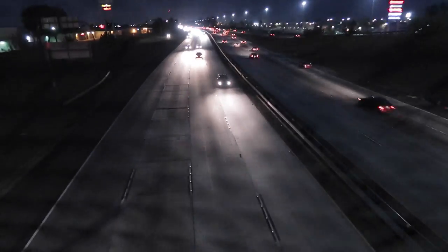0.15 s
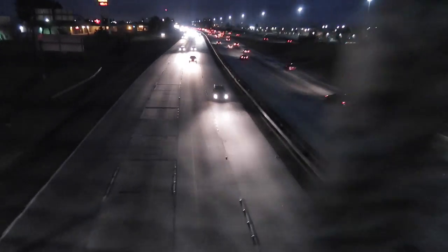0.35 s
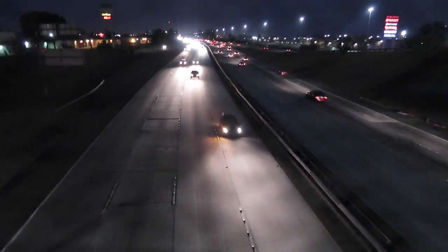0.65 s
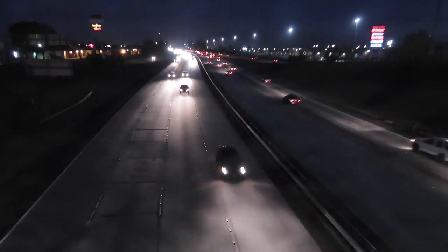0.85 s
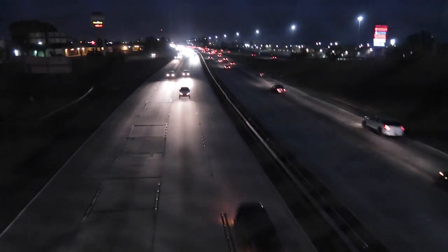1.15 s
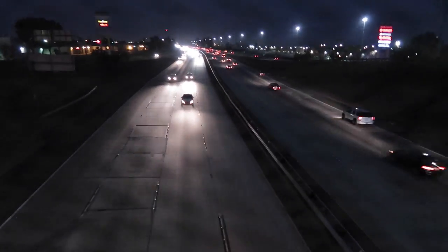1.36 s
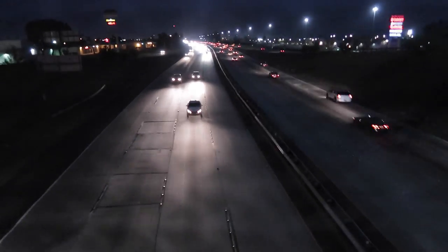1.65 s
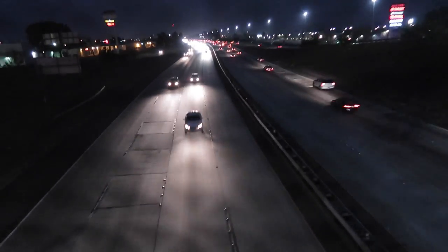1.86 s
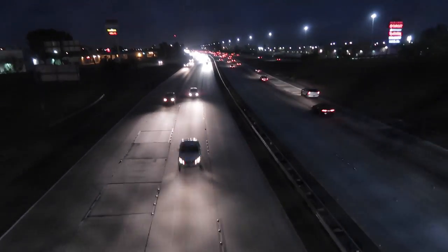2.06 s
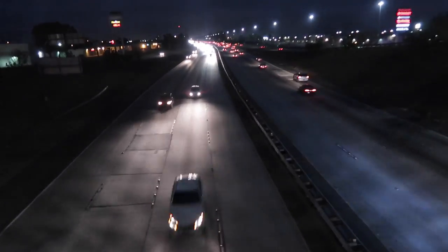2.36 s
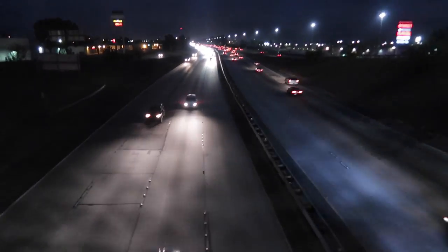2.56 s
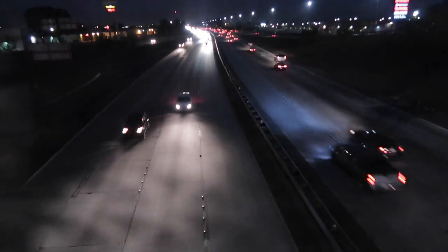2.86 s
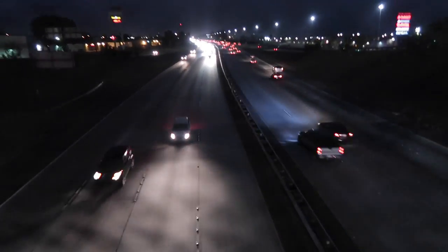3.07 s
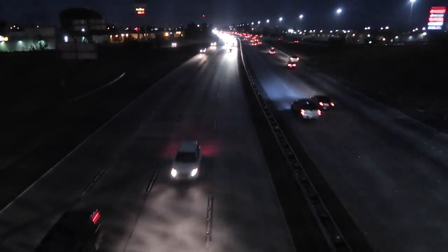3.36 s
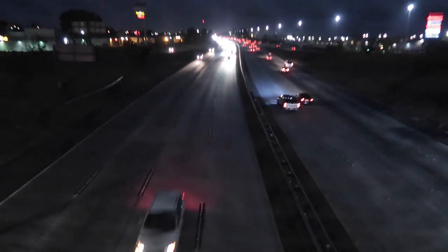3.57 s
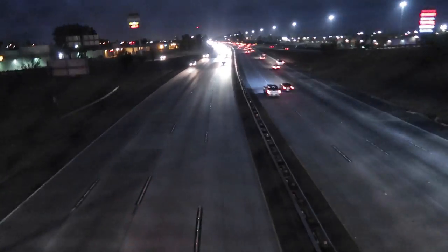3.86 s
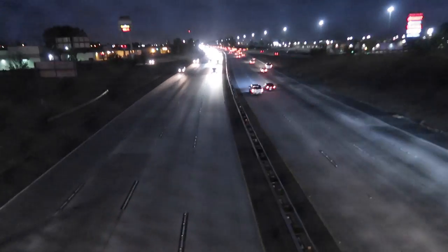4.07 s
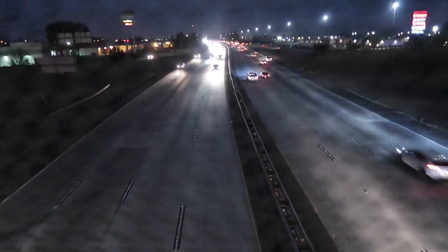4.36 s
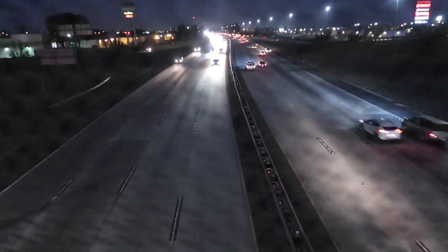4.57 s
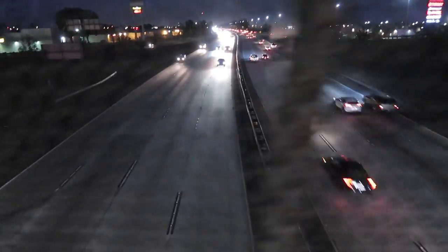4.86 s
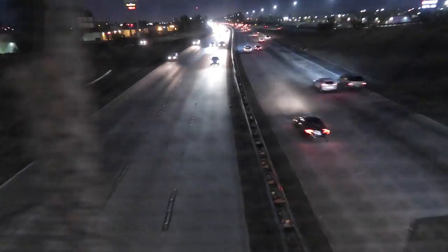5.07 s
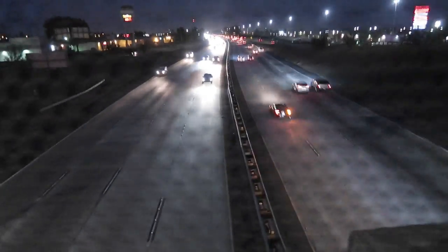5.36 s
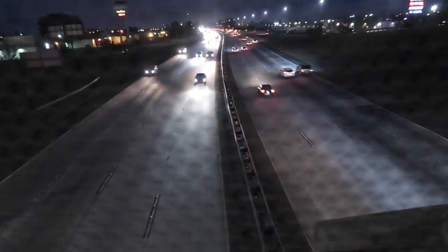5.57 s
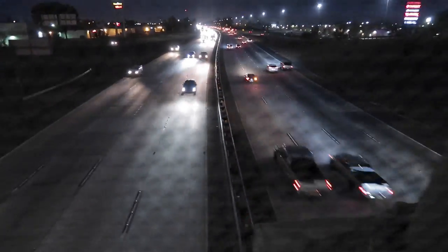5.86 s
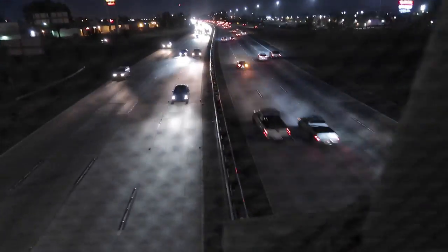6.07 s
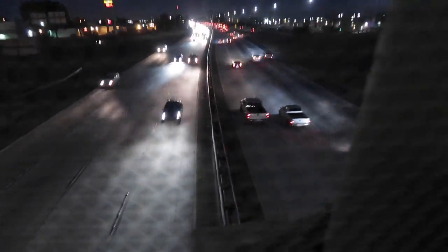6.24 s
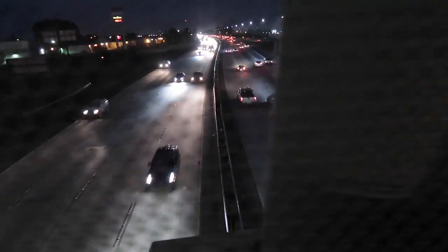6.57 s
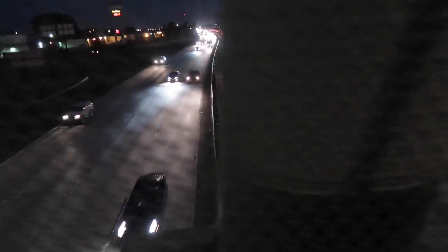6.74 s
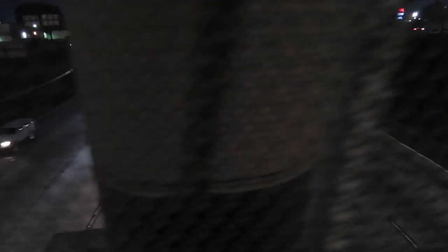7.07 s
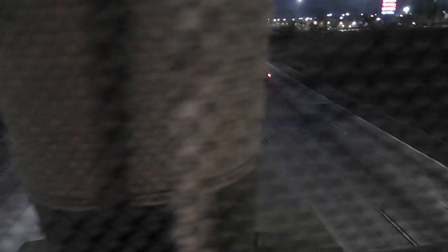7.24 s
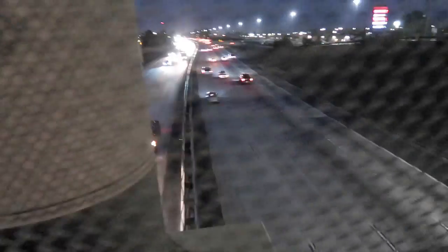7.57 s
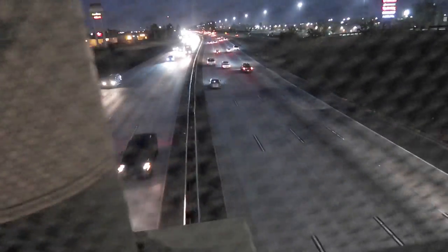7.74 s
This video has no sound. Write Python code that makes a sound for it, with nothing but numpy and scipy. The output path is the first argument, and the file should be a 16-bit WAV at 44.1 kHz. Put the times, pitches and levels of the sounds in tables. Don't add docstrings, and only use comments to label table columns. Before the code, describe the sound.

Steady freeway roar at night, cars swelling past beneath a footbridge with hissing tyres, while wind gusts thump and flutter against a handheld camera's microphone.

```python
import sys
import numpy as np
from scipy import signal
from scipy.fft import rfft, irfft, next_fast_len
from scipy.io import wavfile
from scipy.ndimage import uniform_filter1d, map_coordinates

SR = 44100
rng = np.random.default_rng(int(sys.argv[2]) if len(sys.argv) > 2 else 0)


def bounce(signal):
    frames = np.transpose(np.atleast_2d(signal))
    limited = np.clip(frames, -1, 1)
    pcm = np.round(limited * 32767).astype(np.int16)
    wavfile.write(sys.argv[1], SR, pcm)


def voltage_ratio(decibels):
    exponent = np.asarray(decibels, float) / 20
    return 10 ** exponent


N = 348390
CLOCK_S = np.arange(0, N / SR + .01, .004)

# closest_s, roar_db, half_width_s, brightness_db,
# fizz_db
PASSES = [(.95, -31, 0.27, -2.5, -4), (1.3, -32, 0.15, 3.5, -1), (1.75, -36.5, 0.18, -3.5, -2),
          (2.719, -27.5, 0.32, 0.5, -0.5), (3.15, -31, 0.36, 0.5, -2.5), (3.33, -37.5, .12, 4, -2),
          (3.6, -35, 0.26, 5.5, -2), (4.1, -43, 0.29, -0.5, 3.5), (4.45, -42.5, .15, 6.5, 2.5),
          (4.751, -43, .15, 4.5, 4.5), (5.051, -34.5, 0.21, 2.5, 2), (5.35, -42, .15, 0.5, 7),
          (5.65, -30.5, 0.2, -11, 2.5), (6.049, -24.5, 0.15, -5, 4.5), (6.55, -36, 0.19, 3.5, -3.5),
          (7.2, -46, .15, 7.5, 0), (7.65, -43.5, 0.16, 6, 3), (7.95, -33, 0.12, -1, 0)]
FAR_ROAR_DB, WHINE_DB, HISS_DB, AIR_DB = -38, -15, -24.5, -75
HISS_FLOOR_DB = -67
# freq_hz, level_db_per_hz
ROAR = [(480, 5.5), (560, 1), (640, 3), (720, 1), (820, -1.5), (920, -10), (1030, -17.5), (1200, -18.5),
        (1380, -22.5), (1530, -17.5), (1650, -24), (1800, -35.5)]
# freq_hz, level_db_per_hz
HISS_MID = [(1650, 2), (1850, -6), (2200, -7.5), (2800, -9.5), (3450, -11.5), (3800, -8.5), (4050, -14),
            (4500, -10.5), (4800, -16.5), (5400, -18), (6200, -24.5), (8000, -27.5), (11000, -34.5),
            (12500, -37), (14800, -47)]
# freq_hz, level_db_per_hz
HISS_SIDE = [(1650, 1), (1850, -5.5), (2200, -7.5), (2800, -18), (3450, -13), (3800, -18), (4050, -18),
             (4500, -16.5), (4800, -23), (5400, -26), (6200, -35), (8000, -38), (11000, -46.5),
             (13200, -51.5), (14800, -57.5)]
STEER_HZ = 1665
FIZZ_HZ, AIR_HZ = 4900, 5900
# center_hz, width_hz, level_db
CAVITY_RIDGES = [(3170, 150, 0.5), (3330, 120, -1.5), (3770, 170, -4), (4030, 150, 3.5), (4230, 120, -2.5),
                 (4680, 170, -3.5), (5120, 200, 1), (5650, 220, -2.5)]

# start_s, end_s, first_hz, last_hz, level_db
DRONES = [
    (1.33, 1.87, 157, 145, -28),
    (5.58, 6.25, 143, 132, -33),
    (5.6, 6.15, 770, 725, -42),
    (5.55, 6.15, 685, 655, -42),
    (6.1, 6.72, 645, 630, -40),
    (6.2, 6.5, 600, 595, -44),
]
# time_s, firing_hz, level_db
LORRY = [
    (2.35, 147, -45),
    (2.5, 145, -30),
    (2.75, 135, -28),
    (3.0, 129, -28),
    (3.6, 127, -31),
    (4.2, 128, -30),
    (4.55, 128, -34),
    (5.3, 128, -36),
    (5.6, 127, -48),
]

# start_s, length_s, level_db, speed_0_to_1
GUSTS = [(0.0, 0.058, -24.5, 0.04), (0.081, 0.028, -26, 0.4), (0.137, .3, -29, 0.16),
         (0.486, 0.24, -26, 0.1), (0.749, .12, -24, 0.05), (0.891, 0.32, -26.5, 0.03),
         (1.152, 0.045, -22, 0.5), (1.246, .3, -24.5, 0.11), (1.561, 0.31, -24.5, 0.05),
         (1.943, .14, -20.5, .3), (2.136, 0.04, -23, 1.0), (2.327, 0.11, -27.5, 0.4), (2.51, 1.4, -30, 0.4),
         (2.963, 0.26, -26, 0.9), (4.013, 0.084, -21.5, 0.3), (4.141, 0.1, -20, 0.5),
         (4.274, .06, -18.5, 0.4), (4.384, 0.052, -20.5, 0.6), (4.441, 0.085, -24, .3),
         (5.554, 0.052, -34, 0.2), (5.829, 0.037, -27, .3), (6.034, .14, -23.5, 0.7),
         (6.259, 0.058, -18.5, .5), (6.661, 0.15, -19, 0.9), (6.796, 0.1, -23.5, 0.8),
         (6.868, 0.12, -21, 0.6), (6.995, .05, -29, 0.5), (7.152, 0.095, -34, 0.9), (7.3, 0.13, -35, 0.6),
         (7.724, 0.13, -30, 1)]
GUST_RISE_S, GUST_FALL_S = 0.028, 0.044
SLOW_GUST_DB = [-1, 1.5, -2, -7]
FAST_GUST_DB = [-25, -9.5, -3, -0.5]
RUMBLE_DB = [-11.5, -0.6, -0.47, -1]
RUMBLE_OPENS = [0.47, 0.3, 0.49, 0.15]
# freq_hz, level_db_per_hz
LOW = [(15, -47.5), (25, -31), (45, -13.5), (70, -11.5), (100, -7.5), (135, 3), (200, -2), (300, -4.5),
       (470, -8)]
# time_s, peak_db, center_hz
BLOWS = [(0.006, -11.5, 217.4), (0.115, -9.5, 225), (0.4, -9.5, 254), (1.011, -12, 156), (1.113, -7, 255),
         (1.196, -10.5, 203), (1.335, -11.5, 208), (1.425, -7, 189), (1.476, -10, 206), (1.657, -8, 180),
         (1.81, -3.5, 205), (1.842, -2, 290), (1.92, -5.5, 219), (2.021, -6, 203), (2.144, -6, 335),
         (2.162, -7.5, 320), (2.381, -6, 267), (2.442, -10.5, 263), (2.606, -7.5, 198), (2.709, -10, 200),
         (2.86, -10.5, 254), (2.922, -10.5, 252), (3.012, -9.5, 220), (3.093, -7, 303), (3.114, -10, 222),
         (3.203, -6, 284), (3.327, -8, 318), (3.57, -10.5, 249), (3.884, -12.5, 168), (4.07, -5, 280),
         (4.165, -4, 230), (4.205, -2.5, 251), (4.306, -2.5, 371), (4.323, -10, 229), (4.413, -3, 303),
         (4.51, -9, 278), (5.096, -12.5, 275), (5.351, -15, 275), (5.497, -8.5, 342), (5.586, -9.5, 242),
         (5.67, -13, 258), (6.025, -8, 249), (6.045, -11, 245), (6.096, -5.5, 258), (6.13, -4, 238),
         (6.154, -10.5, 301), (6.289, -7, 274), (6.314, 0, 224), (6.667, -3.5, 364), (6.689, -9, 267),
         (6.751, -3, 303), (6.796, -3.5, 286), (6.816, -4, 326), (6.853, -5, 295), (6.956, -5.5, 248),
         (6.978, 4, 326), (7.399, -16, 278), (7.787, -16.5, 330), (7.834, -13.5, 306), (7.89, -18.5, 249)]
HUSH_SHARE, HUSH_S = 0.45, .006
FILTER_EDGE_HZ = 496

# time_s, peak_db, pitch_hz
TICKS = [(0.091, -48, 3300), (0.343, -55, 3466), (0.473, -44, 3343), (0.727, -48, 3348), (2.256, -46, 3568),
         (2.34, -46, 3926), (2.816, -46, 4158), (3.833, -43, 4600), (4.008, -42, 3820), (4.091, -45, 3490),
         (4.133, -38, 3650), (4.467, -48, 3648), (4.634, -41, 3400), (4.762, -41, 3300), (4.926, -42, 3712),
         (5.133, -42, 3514), (5.218, -45, 4102), (5.847, -56, 3831), (6.349, -43, 4000), (6.51, -42, 3630),
         (6.553, -51, 3440), (6.594, -38.5, 3530), (7.106, -48, 3950), (7.137, -47, 3737),
         (7.22, -48, 3770)]
# time_s, depth_db
DUCKS = [
    (0.0, 4),
    (1.825, 8),
    (4.2, 2),
    (4.412, 4.5),
    (6.31, 3),
    (6.975, 8.5),
]
DUCK_ATTACK_S, DUCK_HOLD_S, RECOVER_DB_PER_S = 0.0084, 0.087, 9
# time_s, width_db
WIDTH_STEPS = [(0.0, 8.5), (1.85, 7.5), (2.1, 1), (4.0, 4.5), (4.56, -8), (5.45, -3), (5.75, -2), (6.02, 2),
               (6.3, 0.5), (6.72, 0.5), (7.05, -8), (7.7, -8.5)]
GLIDE_S = .08
CALM_BASS_DB, GUSTY_BASS_DB = -20, -11
BASS_WIDENS, BASS_NARROWS, GUST_WIDENS = 1.37, 1.8, 0.84
OPENING_DB, OPENING_S = 14, 0.055
# freq_hz, level_db
SPREAD = [(520, -10.5), (750, -2), (1000, 10), (1300, 2.5), (1700, 13.5)]
# time_s, peak_db, sign
CRACKS = [(1.9336, -52, -1), (1.9549, -50, 1), (2.0616, -48, 1), (2.0722, -52, -1), (2.1042, -52, 1),
          (2.1576, -49, 1), (4.4189, -48, -1), (4.5149, -48, 1), (6.2962, -45, -1), (6.6482, -41, 1),
          (6.6696, -43, -1), (6.6802, -44, -1), (6.7336, -44, -1), (6.7442, -42, 1), (6.7549, -49, -1),
          (6.7656, -48, 1), (6.7869, -40, -1), (6.8189, -41, -1), (6.8295, -42, 1), (6.8722, -42, -1),
          (6.8936, -40, 1), (6.9256, -44, 1), (6.9469, -48, -1), (6.9576, -45, 1), (6.9682, -46, 1),
          (6.9789, -50, -1), (6.9896, -49, 1), (7.0109, -54, -1), (7.2136, -51, 1), (7.2349, -53, -1),
          (7.3949, -53, -1), (7.7256, -45, -1), (7.7682, -40, 1), (7.7896, -40, -1), (7.8429, -47, -1),
          (7.8917, -50, -1)]
CRACK_DB, CRACK_DECAY_S, CRACK_TOP_HZ, CRACK_LEFT = 21, .0004, 3000, -.35
# start_s, end_s, low_hz, high_hz
DROPOUTS = [
    (1.61, 1.66, 1750, 2050),
    (1.85, 1.92, 1700, 1950),
    (4.18, 4.22, 1750, 2250),
    (4.29, 4.36, 1850, 2500),
    (4.43, 4.58, 1650, 2100),
    (4.43, 4.47, 2100, 2500),
    (4.53, 4.57, 2250, 2600),
    (6.12, 6.17, 1850, 2050),
    (6.24, 6.34, 1950, 2150),
]
PUSH_DB, PUSH_S = -19, .003
CEILING_HZ = 2300


def unit(x):
    return x / np.sqrt(np.mean(np.abs(x) ** 2) + 1e-20)


def along(points, hz):
    f, v = np.transpose(points)
    return np.interp(np.log(hz + 1), np.log(f + 1), v)


def wobble(rate_hz):
    knots = rng.standard_normal(int(N * rate_hz / SR) + 4)
    return map_coordinates(knots, [np.arange(N) * rate_hz / SR])


def filtered(x, response):
    m = next_fast_len(N + 8192)
    return irfft(rfft(x, m) * response(np.fft.rfftfreq(m, 1 / SR)), m)[:N]


def band(hz, lo_hz, hi_hz, soft=0.038):
    below = np.exp(np.clip((lo_hz - hz) / (soft * lo_hz), -50, 50))
    above = np.exp(np.clip((hz - hi_hz) / (soft * hi_hz), -50, 50))
    return 1 / (1 + below) / (1 + above)


def patchy(patchy_db):
    z = signal.stft(rng.standard_normal(N), nperseg=512)[2]
    field = uniform_filter1d(rng.standard_normal(z.shape), size=5, axis=0)
    field = uniform_filter1d(field, size=14, axis=1)
    return signal.istft(z * voltage_ratio(patchy_db * unit(field)), nperseg=512)[1][:N]


def bursts(times_s, peaks_db, pitches_hz, cycles, chance=1):
    out, t = np.zeros(N + 2000), np.arange(-1000, 1000) / SR
    phases = np.pi * (1 + chance * rng.uniform(-1.1, 1, len(times_s)))
    for s, db, hz, phase in zip(times_s, peaks_db, pitches_hz, phases):
        bell = np.exp(-(t * hz / cycles) ** 2)
        out[round(s * SR):][:len(t)] += voltage_ratio(db) * bell * np.cos(2 * np.pi * hz * t + phase)
    return out[1000:N + 1000]


def steadied(x, seconds):
    power = np.abs(uniform_filter1d(x ** 2, size=int(seconds * SR)))
    return unit(x / np.sqrt(power + 1e-12))


def sampled(levels):
    return [np.interp(np.arange(N) / SR, CLOCK_S, level) for level in levels]


def summed_db(parts_db):
    return 10 * np.log10(np.sum(voltage_ratio(parts_db) ** 2, axis=0))


def tyres():
    roar_db, whine_db = sampled(road_levels()[:2])
    road = voltage_ratio(0.19 * wobble(9.5)) * patchy(patchy_db=2.0)
    roar = filtered(road, lambda f: voltage_ratio(along(ROAR, f)) * np.sqrt(band(f, FILTER_EDGE_HZ, 1002, soft=0.041)))
    whine = filtered(road, lambda f: voltage_ratio(along(ROAR, f)) * np.sqrt(band(f, 1038, STEER_HZ, soft=0.034)))
    howl = filtered(road, lambda f: band(f, 585, 790, soft=0.048))
    howl_swell = 0.69 * np.exp(-((np.arange(N) / SR - 5.95) / 0.5) ** 2)
    roar = unit(roar) + howl_swell * unit(howl)
    return voltage_ratio(roar_db) * steadied(roar, seconds=0.15) + voltage_ratio(whine_db) * steadied(whine, seconds=0.16)


def road_levels():
    s, db, half_s, bright_db = np.transpose(PASSES)[:4, :, None]
    cars_db = db - 10 * np.log10(1 + ((CLOCK_S - s) / half_s) ** 2)
    far_db = np.full((1, len(CLOCK_S)), FAR_ROAR_DB)
    roar_db, top_db = [summed_db(np.vstack([cars_db + lift, far_db])) + ducking() for lift in (0, bright_db)]
    hiss_db = summed_db([top_db + 32 - 32.5 + HISS_DB, np.full(len(CLOCK_S), HISS_FLOOR_DB)])
    air_db = AIR_DB + 0.69 * ducking() + 0.14 * width_setting()
    return roar_db, top_db + WHINE_DB, hiss_db, air_db


def hiss(spectrum, gain_db, far_db, fizz_follows):
    hiss_db, air_db = sampled(road_levels()[2:])
    fizz_db = fizz()
    noise = voltage_ratio(0.2 * wobble(7.4) + 0.64 * wobble(24)) * patchy(patchy_db=2.0)
    noise = noise + 0.018 * np.roll(noise, round(0.00064 * SR))
    near = filtered(noise, lambda f: voltage_ratio(along(spectrum, f)) * band(f, STEER_HZ, 30000, soft=0.029)
                    * np.sqrt(band(f, 5, AIR_HZ)))
    top = filtered(near, lambda f: band(f, FIZZ_HZ, 30000, soft=0.03))
    near = (near + (voltage_ratio(fizz_db) - 1) * top) / np.std(near)
    far = filtered(noise, lambda f: voltage_ratio(along(spectrum, f)) * np.sqrt(band(f, AIR_HZ, 30000)))
    far_level_db = air_db + far_db + fizz_follows * fizz_db + 0.26 * (hiss_db + 58.5)
    return voltage_ratio(hiss_db + gain_db) * near + voltage_ratio(far_level_db) * unit(far)


def fizz():
    s, db, half_s, bright_db, fizz_db = np.transpose(PASSES)[:, :, None]
    power = voltage_ratio(db + bright_db) ** 2 / (1 + ((CLOCK_S - s) / half_s) ** 2)
    mean_db = np.sum(power * fizz_db, axis=0) / np.sum(power, axis=0)
    return sampled([mean_db + 0.25 * ducking()])[0]


def ridged(x):
    return filtered(x, lambda f: voltage_ratio(sum(db * np.exp(-(2 * (f - hz) / width_hz) ** 2 / 2)
                                         for hz, width_hz, db in CAVITY_RIDGES)))


def wind():
    *levels, gusty = sampled([*low_levels(), gustiness()])
    levels = [level + .9 * wobble(13) for level in levels]
    lumps = voltage_ratio(gusty * (2.3 * wobble(130) + 0.25 * wobble(24)))
    lumps = lumps / np.sqrt(uniform_filter1d(lumps ** 2, size=5000))
    eddies = lumps * patchy(patchy_db=-1.0)
    edges_hz = [(5, 95.4), (90, 179.7), (200, 292.3), (330, 700)]
    parts = [filtered(eddies, lambda f: voltage_ratio(along(LOW, np.minimum(f, 470))) * np.sqrt(band(f, *e))
                      * band(f, 5, FILTER_EDGE_HZ, soft=0.013)) for e in edges_hz]
    s, db, hz = np.transpose(BLOWS)
    blows = filtered(bursts(s, db, hz, cycles=0.5, chance=.25),
                     lambda f: band(f, 60, FILTER_EDGE_HZ, soft=0.031) + voltage_ratio(-21.5) * band(f, FILTER_EDGE_HZ, 1300))
    near_blow = np.exp(-((CLOCK_S - s[:, None]) / HUSH_S) ** 2)
    hush, = sampled([np.prod(1 - HUSH_SHARE * near_blow, axis=0)])
    return hush * sum(voltage_ratio(level) * steadied(part, seconds=0.1) for level, part in zip(levels, parts)) + blows


def low_levels():
    s, length_s, db, speed = np.transpose(GUSTS)[:, :, None]
    rise, fall = (CLOCK_S - s) / GUST_RISE_S + 1, (s + length_s - CLOCK_S) / GUST_FALL_S + 1
    gust_db = db + 20 * np.log10(np.clip(np.minimum(rise, fall), 1e-4, 1))
    engine_db = 0.84 * (road_levels()[0] + 32) - 32.5
    width_db = width_setting()
    return [summed_db(np.vstack([gust_db + slow + speed * (fast - slow), [engine_db + rumble + opens * width_db]]))
            for slow, fast, rumble, opens in zip(SLOW_GUST_DB, FAST_GUST_DB, RUMBLE_DB, RUMBLE_OPENS)]


def gustiness():
    return np.clip((low_levels()[3] - road_levels()[0] + 4.5) / 11, .15, 1)


def leak():
    spill = filtered(patchy(patchy_db=0.5), lambda f: (np.maximum(f, 350) / FILTER_EDGE_HZ) ** -3.2
                     * band(f, FILTER_EDGE_HZ, 4000, soft=0.059))
    flutter_db, = sampled(low_levels()[3:])
    return voltage_ratio(0.87 * (flutter_db + 20.0) - 38.5) * unit(spill)


def drones():
    t, out = np.arange(N) / SR, np.zeros(N)
    for start, end, first_hz, last_hz, db in DRONES:
        hz = np.interp(t, [start, end], [first_hz, last_hz]) * (1 + .011 * wobble(9))
        swell = np.clip(np.minimum(t - start, end - t) / 0.029, 0, 1)
        tone = np.sin(2 * np.pi * np.cumsum(hz) / SR)
        out += voltage_ratio(db + 9) * swell * (0.86 + 0.28 * wobble(22)) * tone
    return out


def lorry():
    s, hz, db = np.transpose(LORRY)
    t = np.arange(N) / SR
    turn = 2 * np.pi * np.cumsum(np.interp(t, s, hz) * (1 + .004 * wobble(6))) / SR
    octave = voltage_ratio(-4 + np.interp(t, [3, 4.6], [-4, 3])) * np.sin(2 * turn)
    level_db = np.interp(t, s, db, left=-120, right=-120) + 1.5 * wobble(8)
    return np.sqrt(2) * voltage_ratio(level_db) * (np.sin(turn) + octave)


def camera():
    s, db, hz = np.transpose(TICKS)
    ticks = bursts(s, db + 0.5, hz, cycles=3.2) + bursts(s, db - 9, 1.45 * hz, cycles=8.6)
    whine = filtered(rng.standard_normal(N), lambda f: band(f, 12990, 13045, soft=.001)
                     + .6 * band(f, 11770, 11820, soft=.001))
    return ticks + voltage_ratio(-88) * unit(whine)


def ducking():
    s, depth_db = np.transpose(DUCKS)[:, :, None]
    drop_db = depth_db * np.clip((CLOCK_S - s) / DUCK_ATTACK_S, 0, 1)
    climb_db = RECOVER_DB_PER_S * np.maximum(CLOCK_S - s - DUCK_HOLD_S, 0)
    return -np.sum(np.clip(drop_db - climb_db, 0, None), axis=0)


def width_setting():
    s, db = np.transpose(WIDTH_STEPS)[:, :, None]
    return db[0] + np.sum(np.diff(db, axis=0) * np.clip((CLOCK_S - s[1:]) / GLIDE_S, 0, 1), axis=0)


def widths():
    treble_db = width_setting()
    calm_db = CALM_BASS_DB + np.where(treble_db > 0, BASS_WIDENS, BASS_NARROWS) * treble_db
    gusty = uniform_filter1d(np.clip(1.1 * gustiness() - .24, 0, 1), size=25)
    bass_db = calm_db + gusty * (GUSTY_BASS_DB + GUST_WIDENS * treble_db - calm_db)
    return sampled([bass_db + OPENING_DB * np.exp(-(CLOCK_S / OPENING_S) ** 2), treble_db])


def widened(common, bass_db, treble_db):
    wide = np.clip((bass_db + 19.5) / 10.0, 0, 1)
    out, turn = np.zeros(N), -2.5 - 0.027 * (bass_db + 17.0)
    for slope, share in [(1.8, wide), (3.6, 1 - wide)]:
        bass = filtered(common, lambda f: (f / 346) ** slope * band(f, 5, FILTER_EDGE_HZ, soft=.03))
        out += share * voltage_ratio(bass_db) * np.real(signal.hilbert(bass) * np.exp(1j * turn))
    turn = -1.47 - .085 * treble_db
    for lo_hz, hi_hz, follow, lift_db in [(FILTER_EDGE_HZ, 950, 1, 0), (950, STEER_HZ, .55, .4)]:
        part = filtered(common, lambda f: voltage_ratio(along(SPREAD, f)) * band(f, lo_hz, hi_hz, soft=.03))
        out += voltage_ratio(follow * treble_db + lift_db) * np.real(signal.hilbert(part) * np.exp(1j * turn))
    return out


def cracks():
    s, db, sign = np.transpose(CRACKS)
    jumps = np.bincount(np.round(s * SR).astype(int), sign * voltage_ratio(db + CRACK_DB), N)
    step = filtered(jumps, lambda f: CRACK_DECAY_S * SR / (1 + 2j * np.pi * f * CRACK_DECAY_S)
                    / (1 + 1j * f / CRACK_TOP_HZ) * band(f, 400, 30000, soft=.3))
    return np.array([CRACK_LEFT * step, step])


def starved(x):
    common, t, lost = x.mean(axis=0), np.arange(N) / SR, np.zeros(N)
    for start, end, lo_hz, hi_hz in DROPOUTS:
        gate = np.clip(np.minimum(t - start, end - t) / 0.013 + 1, 0, 1)
        lost += gate * filtered(common, lambda f: band(f, lo_hz, hi_hz, soft=.004))
    return x - lost


def scene():
    common, body = tyres() + wind() + drones() + lorry(), camera()
    bass_db, treble_db = widths()
    mid = common + leak() + hiss(HISS_MID, gain_db=0.42, far_db=3.0, fizz_follows=.15) + voltage_ratio(-4.5) * body
    echoes = voltage_ratio(-13.5) * tyres()
    scattered = widened(common + echoes, bass_db, treble_db)
    side_hiss = ridged(hiss(HISS_SIDE, gain_db=11, far_db=8.5, fizz_follows=1.2))
    side = scattered + voltage_ratio(.2 * treble_db) * side_hiss + body
    return np.array([mid + side, mid - side]) + cracks()


def low_pass(x):
    return signal.sosfilt(signal.butter(12, 15100, fs=SR, output="sos"), x)


def record(dry):
    pushed = dry + (voltage_ratio(PUSH_DB) - dry[:, :1]) * np.exp(-(np.arange(N) / SR / PUSH_S) ** 2)
    excess = pushed - pushed / (1 + np.abs(pushed / 0.96) ** 8.0) ** (1 / 8)
    limited = pushed - [filtered(port, lambda f: band(f, 1, CEILING_HZ, soft=.2)) for port in excess]
    return low_pass(starved(limited))


dry = scene()
out = record(dry)
bounce(out)
```